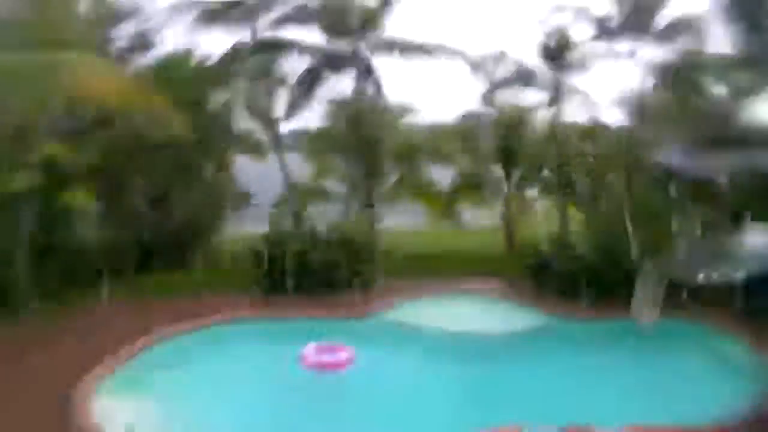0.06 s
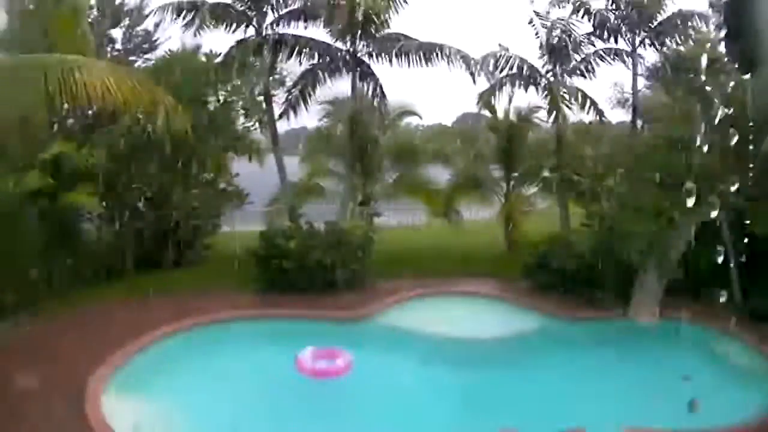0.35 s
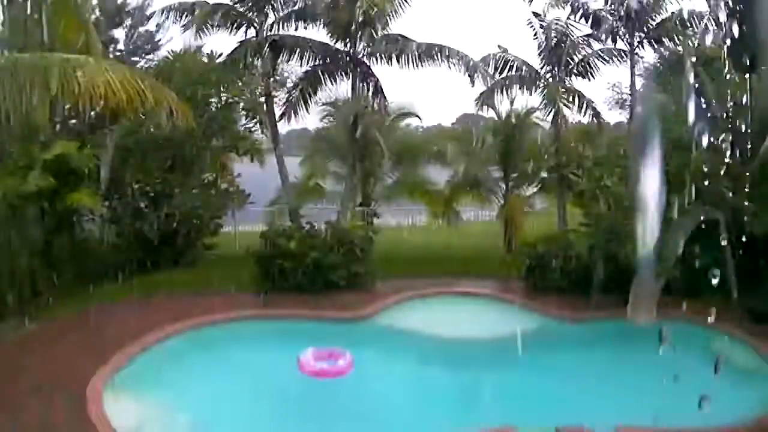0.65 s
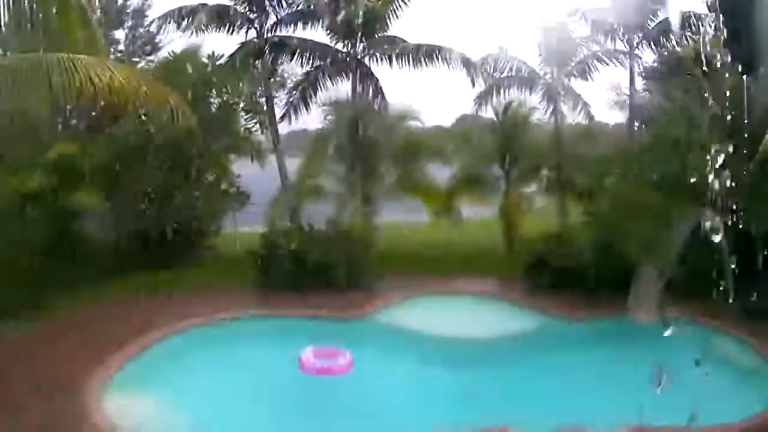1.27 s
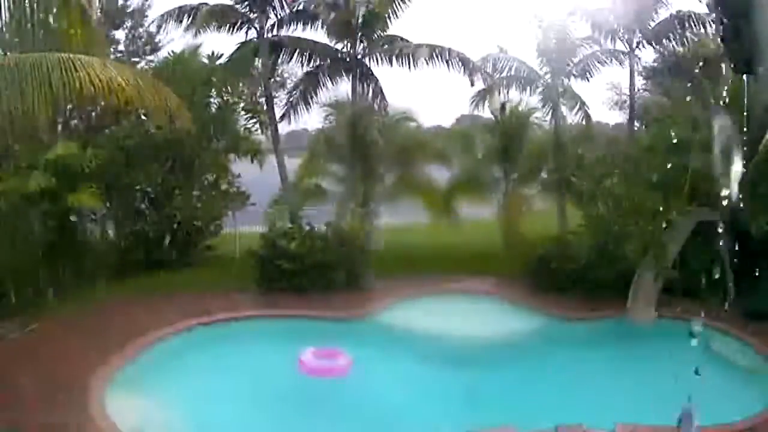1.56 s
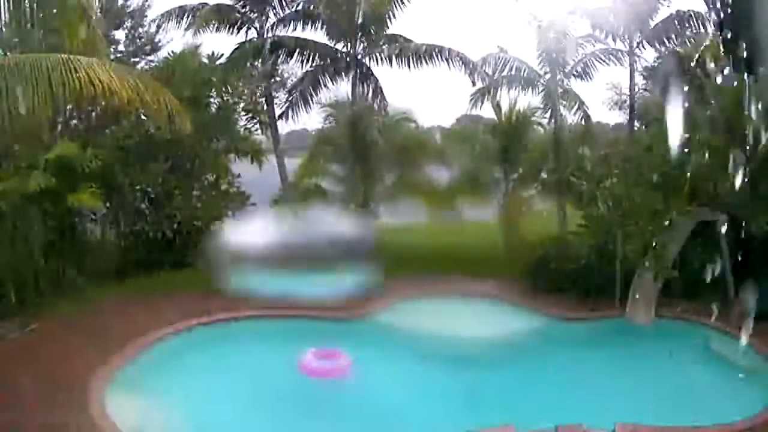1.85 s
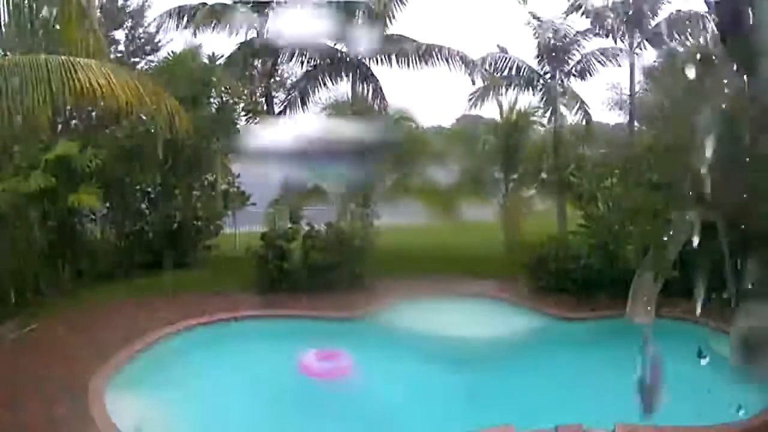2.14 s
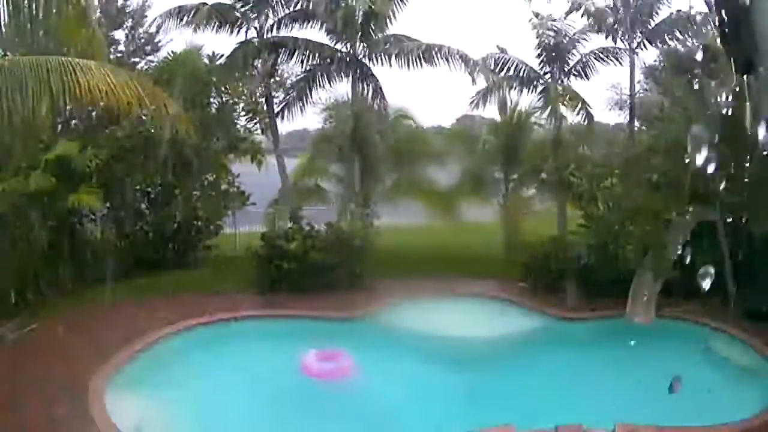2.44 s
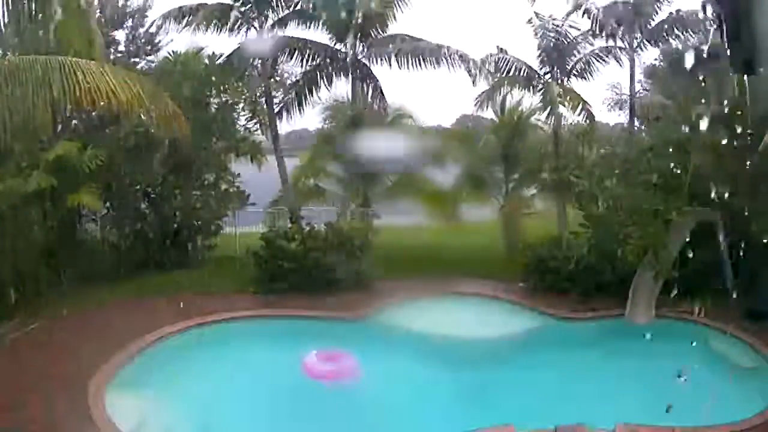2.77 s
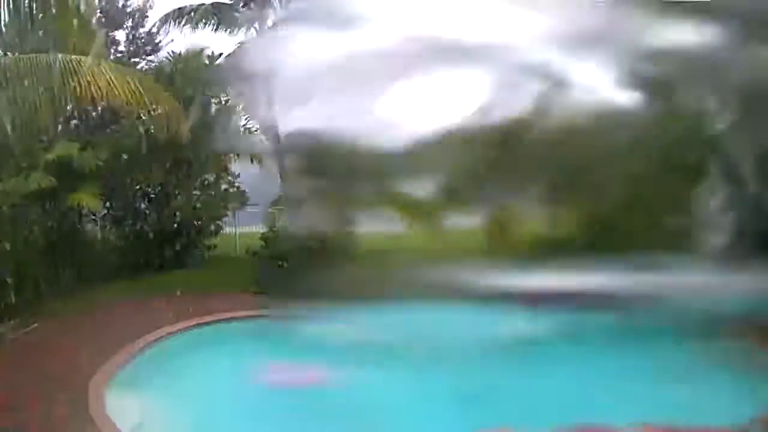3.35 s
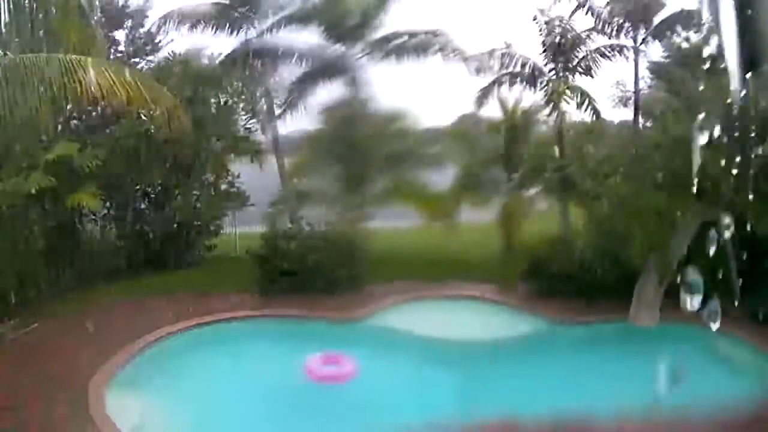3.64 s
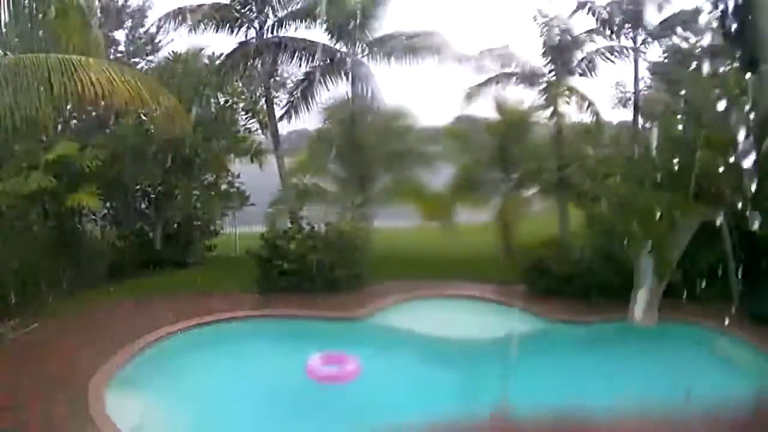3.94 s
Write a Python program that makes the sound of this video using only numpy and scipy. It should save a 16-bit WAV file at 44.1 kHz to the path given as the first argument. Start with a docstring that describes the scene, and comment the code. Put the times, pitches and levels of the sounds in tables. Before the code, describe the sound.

A downpour makes a constant rush over a backyard pool and booms on the roof overhead. Fine spray crackles and nearby drips tick and plop throughout, a few hitting the sheltered microphone hard enough to overload it briefly.

```python
"""Heavy rain from under the eaves

Rain pours on a roof, a pool and a garden. The roof booms and drums as drops set it ringing,
and countless splashes make a steady wash in front of it. Close drops crackle, splat, plop,
tick and knock on the microphone's housing, and the hardest overload the microphone."""
import sys
import numpy as np
from scipy import signal
from scipy.fft import rfft, irfft
from scipy.io import wavfile
from scipy.ndimage import uniform_filter1d

SR = 44100
rng = np.random.default_rng(int(sys.argv[2]) if len(sys.argv) > 2 else 0)


def digitize_waveform(pressure):
    """Quantize a signal to 16-bit integers and store it at the path in sys.argv[1].

    Rows of a 2-D input are taken as channels; values are limited to [-1, 1].
    """
    field = np.atleast_2d(pressure).T
    bounded = np.clip(field, -1, 1)
    quanta = np.round(bounded * 32767).astype(np.int16)
    wavfile.write(sys.argv[1], SR, quanta)


N = 176400


def from_db(db):
    """Turn decibels into a factor to multiply by."""
    return 10 ** (np.asarray(db) / 20)


def rms_one(x):
    """Scale a signal so its average strength (rms) is 1."""
    return x / np.sqrt(np.mean(x ** 2) + 1e-20)


def in_time(rows):
    """Join (time, value) points with straight lines, one value per sample."""
    return np.interp(np.arange(N) / SR, *np.transpose(rows))


def drift(rate_hz):
    """A smooth random wobble of about size 1, mostly slower than rate_hz."""
    step = 40  # samples between computed points
    r = np.exp(-2 * np.pi * rate_hz * step / SR)
    noise = rng.standard_normal(N // step + 2002)
    slow = signal.lfilter([1], [1, -2 * r, r * r], noise)[2000:]  # skip the filter's warm-up
    return np.interp(np.arange(N) / step, np.arange(len(slow)), rms_one(slow))


def coloured(x, spectrum):
    """Give a signal the tone colour of (frequency, level) points, at strength 1."""
    hz, db = np.transpose(spectrum)
    grid_hz = np.maximum(np.arange(N // 2 + 1) * SR / N, 1)
    gain = from_db(np.interp(np.log(grid_hz), np.log(hz), db))
    cepstrum = irfft(np.log(gain), N)
    cepstrum[N // 2:] = 0  # makes the filter ring after a click, not before it
    return rms_one(irfft(rfft(x) * np.exp(2 * rfft(cepstrum)), N))


def impacts(per_s, spread_db):
    """Drops landing at random: many small clicks and a few large ones."""
    sizes = from_db(spread_db * np.minimum(rng.exponential(1, N), 4.5))
    lands = rng.random(N) < per_s / SR
    return lands * sizes * rng.choice([-1, 1], N)


def clicks(rows):
    """One click for each (time, level) row."""
    out = np.zeros(N)
    for t, db in rows:
        out[int(t * SR)] += from_db(db)
    return out


def ring(x, hz, t60):
    """Each click starts a pure tone that fades by 60 dB in t60 seconds."""
    r = from_db(-60 / (t60 * SR))
    angle = 2 * np.pi * hz / SR
    return signal.lfilter([0, np.sin(angle)], [1, -2 * r * np.cos(angle), r * r], x + 1e-18)


def resonance(x, hz, width_hz):
    """Let through a band of pitches around hz."""
    r = np.exp(-np.pi * width_hz / SR)
    feedback = [1, -2 * r * np.cos(2 * np.pi * hz / SR), r * r]
    return signal.lfilter(np.array([1, 0, -1]) * (1 - r * r) / 2, feedback, x + 1e-18)


def blip(x, hz, t60):
    """Each click starts a tone that swells quickly and dies away."""
    width_hz = np.log(1000) / (np.pi * t60)
    return np.e * resonance(ring(x, hz, t60), hz, width_hz)


def roof_ringing(modes, levels, gain_db, even_s=0.11, evenness=0.51):
    """Dense drops keep a set of the roof's notes ringing."""
    ringing = 0
    for hz, width_hz, db in modes:
        note = resonance(impacts(per_s=900, spread_db=3.5), hz, width_hz)
        ringing += from_db(db) * rms_one(resonance(note, hz, 4 * width_hz))
    power = np.abs(uniform_filter1d(ringing ** 2, int(even_s * SR))) + 1e-9
    evened = ringing / power ** (evenness / 2)  # partly smooth out chance swells
    return from_db(gain_db + in_time(levels)) * rms_one(evened)


def roof():
    """Rain on the roof makes a deep boom and a higher drumming."""
    # the roof's deep notes and its higher ones: f/Hz, width/Hz, relative level/dB
    boom_modes = [(57, 12, -19.5), (72, 19, -24), (187.1, 15, 2), (210, 55, -6.5)]
    drum_modes = [(350.3, 31.2, 0), (383.7, 60, -8), (466.7, 48, -14)]
    # how each set swells and fades: t/s, relative level/dB
    boom_levels = [(0.0, -27.5), (0.26, -25), (0.29, -17), (0.39, -30), (0.57, -21.5), (0.63, -34),
                   (0.69, -20), (0.76, -31), (1.08, -20), (1.26, -32), (1.46, -23.5), (2.06, -24),
                   (2.42, -17), (2.6, -35), (2.72, -23.5), (3.62, -22), (3.9, -26), (4.0, -15.5)]
    drum_levels = [(0, -12.5), (.09, -18.5), (.22, -19), (.31, -16), (.41, -23), (.52, -15.5), (.63, -10.5),
                   (.73, -18), (.86, -16), (.92, -20), (.99, -13), (1.12, -18), (1.16, -10.5), (1.21, -21),
                   (1.35, -11.5), (1.45, -19), (1.59, -13), (1.75, -14.5), (1.81, -21), (1.96, -11.5),
                   (2.02, -20), (2.1, -11.5), (2.16, -18), (2.35, -17), (2.47, -17.5), (2.53, -12.5),
                   (2.61, -23), (2.7, -10.5), (2.8, -18), (3.12, -16.5), (3.38, -13.5), (3.56, -14.5),
                   (3.77, -11), (3.82, -19.5), (3.88, -12), (4, -16.5)]
    boom = roof_ringing(boom_modes, boom_levels, gain_db=0.5)
    return boom + roof_ringing(drum_modes, drum_levels, gain_db=-0.5)


def wash(far_db=1, flicker_db=2.27, near_db=-1.5):
    """Far rain on pool and garden blurs into a rush; nearer splashes stay grainy."""
    # tone colour of the splashing under the eaves: f/Hz, relative level/dB
    colour = [(20, -11), (104, -12), (135, 0), (235, -0.5), (550, 0.5), (650, 1), (725, 2.5), (810, 0),
              (890, -0.5), (1010, -4.5), (1080, -0.5), (1145, -3.5), (1215, 1.5), (1290, -1.5), (1440, 4.5),
              (1500, -2), (1620, 3), (1730, -4), (1950, 1), (2080, -6), (2200, -2.5), (2440, -15),
              (2660, -9), (2790, -4.5), (3020, -17.5), (3350, -10), (4050, -22), (5500, -29), (7200, -30.5)]
    # strength of the splashing: t/s, relative level/dB
    downpour = [(0, -20.5), (.2, -21), (.4, -21.5), (.58, -20.5), (.85, -22), (1.15, -21.5), (1.42, -22.5),
                (1.58, -19.5), (1.8, -22), (1.9, -19.5), (2.3, -21.5), (2.44, -18), (2.6, -22.5),
                (2.73, -19), (2.9, -20), (3.07, -19), (3.5, -19.5), (4, -19.5)]
    far_gain = from_db(far_db + flicker_db * drift(rate_hz=19.7))
    far = far_gain * coloured(rng.standard_normal(N), colour)
    near = from_db(near_db) * coloured(impacts(per_s=700, spread_db=1), colour)
    return from_db(in_time(downpour)) * (far + near)


def eaves(x):
    """Roof and wall bounce a sound back as quick, quiet echoes."""
    # the echoes: delay/s, level/dB
    echoes = [(0.0114, -15.5), (0.0186, -18)]
    n = np.arange(N)
    return x + sum(from_db(db) * np.interp(n - delay * SR, n, x, left=0) for delay, db in echoes)


def tick(drops, hz, t60):
    """A small drop hits with a tiny crack and a short, high ring."""
    crack = from_db(-17.5) * ring(drops, hz=5800, t60=0.0022)
    return crack + blip(drops, hz, t60)


def spray(drops_per_s=260, pitch_count=8, ring_cycles=8, gain_db=-25.5):
    """Fine droplets blow in under the eaves and crackle at many pitches."""
    # how much spray blows in: t/s, relative level/dB
    levels = [(0, 8), (.25, 0), (.42, -5), (.58, -4), (.8, -2), (1.35, -8), (1.58, 4.5), (1.78, -3),
              (2.25, 1.5), (2.45, 3), (2.9, 2), (3.15, 0), (3.5, -4), (4, 3.5)]
    crackle = 0
    for hz in np.geomspace(1370, 3490, pitch_count):
        droplets = impacts(drops_per_s / pitch_count, spread_db=3)
        crackle += tick(droplets, hz, t60=ring_cycles / hz)
    return from_db(gain_db + in_time(levels)) * crackle


def splats(t60=0.046, gain_db=-11):
    """Drops burst on the ground nearby, each with a brief, dying hiss."""
    # the bursting drops: t/s, relative level/dB
    drops = [(.551, -3.5), (.9365, 0.5), (1.4851, -9), (1.545, -5.5), (1.8733, 1.5), (2.385, -1),
             (2.415, -7), (2.4624, -4), (2.705, -0.5), (2.745, -8), (3.0606, 3), (3.2001, 3), (3.2197, -1),
             (3.2705, -4), (3.5365, -17.5), (3.731, 0), (3.767, -4), (3.8218, -3.5)]
    # tone colour of the hiss: f/Hz, relative level/dB
    colour = [(100, -25.5), (600, -6), (1400, 2), (2100, 4.5), (3400, -4), (4200, -16), (7200, -24)]
    decay = from_db(-60 / (t60 * SR))
    envelope = signal.lfilter([1], [1, -decay], clicks(drops) + 1e-18)
    return from_db(gain_db) * envelope * coloured(rng.standard_normal(N), colour)


def plops(gain_db=-3.5):
    """Fat drips from the eaves each land with a short, hollow note."""
    # the drips: t/s, relative level/dB, f/Hz
    drips = [(.1772, 0.5, 780), (.198, 2, 960), (.208, -4, 760), (.2595, -2.5, 820), (.9322, -5, 800),
             (.9362, 3, 1000), (.9408, -2, 680), (3.076, -1, 1010), (3.151, -14, 1170), (3.448, -9, 1070),
             (3.665, 4.5, 930)]
    return from_db(gain_db) * sum(blip(clicks([(t, db)]), hz, t60=0.0082) for t, db, hz in drips)


def ticks(gain_db=-0.5):
    """Small, sharp drops tick right at the microphone."""
    # the drops: t/s, relative level/dB, f/Hz
    drops = [(.1012, -3, 3350), (0.105, -8, 3280), (0.124, -9.5, 3200), (0.1816, -7.5, 3440),
             (0.2123, 1, 3440), (.3245, -13, 3170), (0.3741, -16, 3500), (.378, -7, 3180),
             (0.5818, -12, 3600), (.9102, -17, 3300), (1.1746, -9.5, 3240), (1.237, -15, 3440),
             (1.589, -11, 3500), (1.9487, 3.5, 2710), (2.2157, -12.5, 3350), (2.5491, -9, 3480),
             (2.606, -23, 3470), (2.6214, -7, 3370), (3.1129, 9.5, 3370), (3.2848, -2, 3180),
             (3.5919, 14, 3284)]
    return from_db(gain_db) * sum(tick(clicks([(t, db)]), hz, t60=0.0048) for t, db, hz in drops)


def knocks():
    """Heavy drops ring the microphone's housing and shove it with a thud; each hit has its own brightness."""
    # the heavy drops: t/s, relative level/dB, treble cutoff/Hz, thud level/dB
    drops = [(.1007, -6.5, 6000, -22), (.3355, 13.5, 1100, -21), (.4652, 14, 3000, -4),
             (.4775, -4.5, 4000, -15), (1.9482, -2, 6060, -26), (3.0752, -1, 1490, -32),
             (3.2847, -2.5, 4900, -14), (3.4431, -7, 2500, -30), (3.9669, -5.5, 5000, -30)]
    # the housing's notes: f/Hz, relative level/dB, time to fade by 60 dB/s
    modes = [(1217, -1, 0.026), (1430, -9.5, 0.033), (1890, -2.5, .028), (2240, 1.5, 0.015),
             (2683, -0.5, 0.012), (3460, -6, 0.028), (4660, -3, 0.0034)]
    force = 0
    for t, db, cutoff_hz, _ in drops:
        softness = np.exp(-2 * np.pi * cutoff_hz / SR)
        force += signal.lfilter([1 - softness], [1, -softness], clicks([(t, db)]))
    # every second note starts by swinging the other way
    housing = sum((-1) ** k * from_db(db) * ring(force, hz, t60) for k, (hz, db, t60) in enumerate(modes))
    shoves = clicks([(t, thud_db) for t, _, _, thud_db in drops])
    return housing + ring(shoves, hz=64, t60=0.048)


def scene():
    """Roof, wash and close drops add up in one channel."""
    return (roof() + eaves(wash()) + spray() + splats() + plops() + ticks() + knocks())[None]


def record(dry, ceiling=0.59, sharpness=6):
    """The loudest peaks overload the microphone and are flattened; the treble is cut steeply."""
    clipped = dry / (1 + np.abs(dry / ceiling) ** sharpness) ** (1 / sharpness)
    low_pass = signal.firwin(201, cutoff=7220, width=1150, fs=SR)
    return signal.fftconvolve(clipped, low_pass[None], "same")


dry = scene()
out = record(dry)
digitize_waveform(out)
```